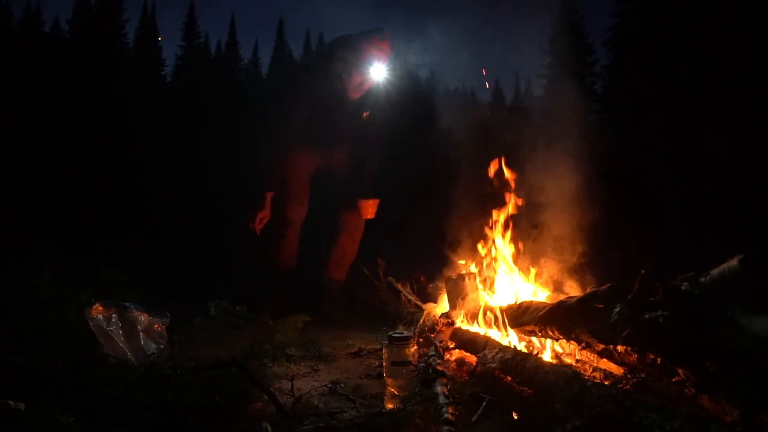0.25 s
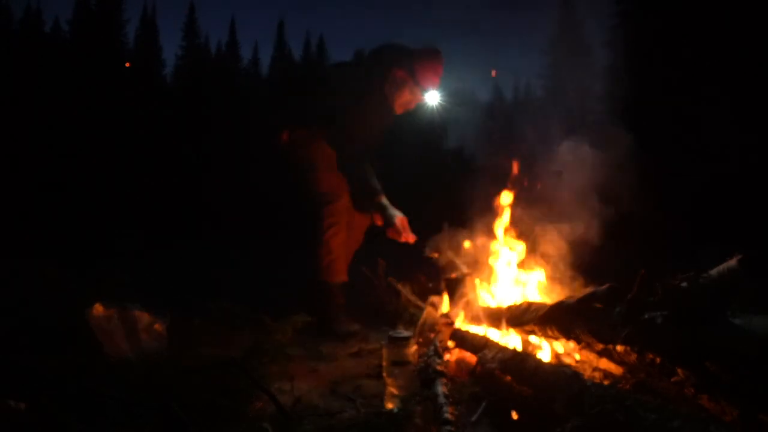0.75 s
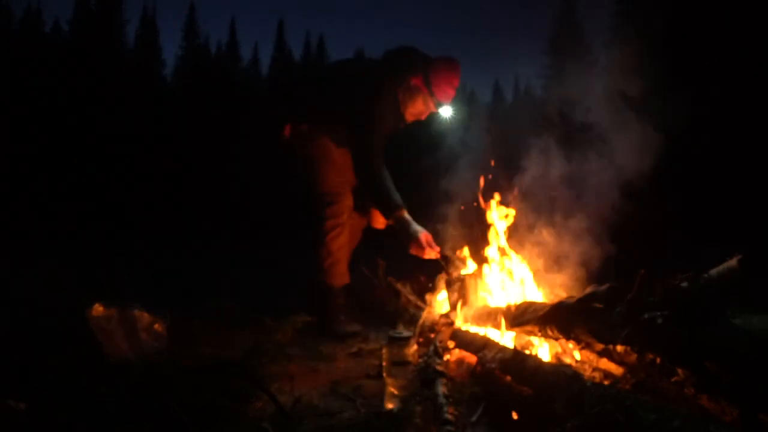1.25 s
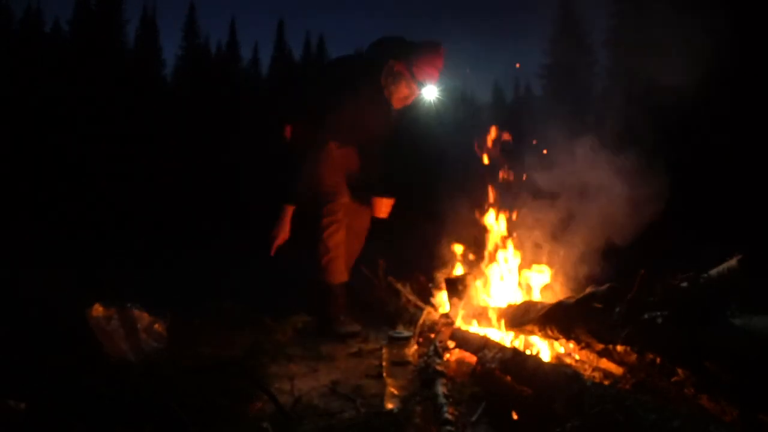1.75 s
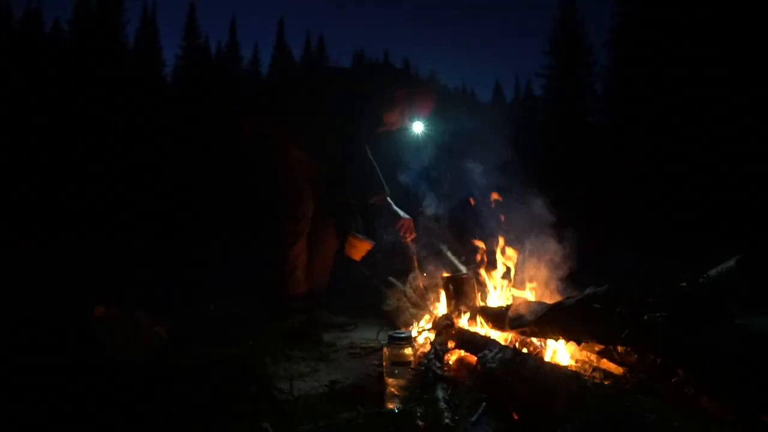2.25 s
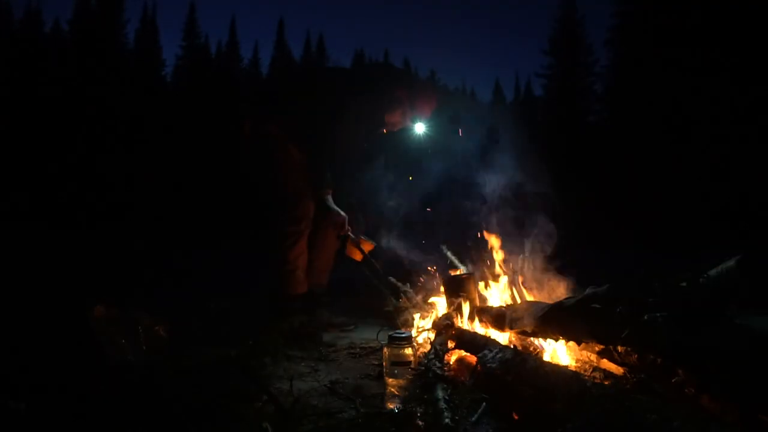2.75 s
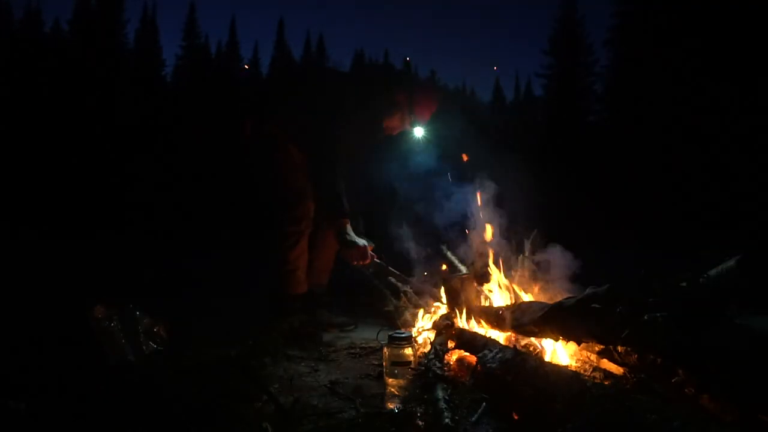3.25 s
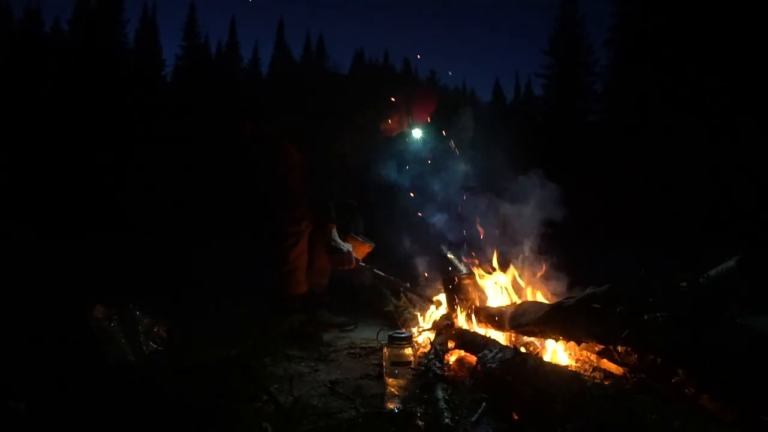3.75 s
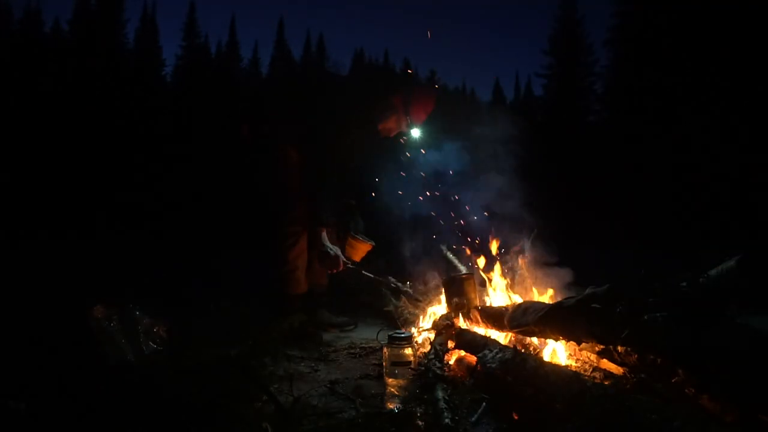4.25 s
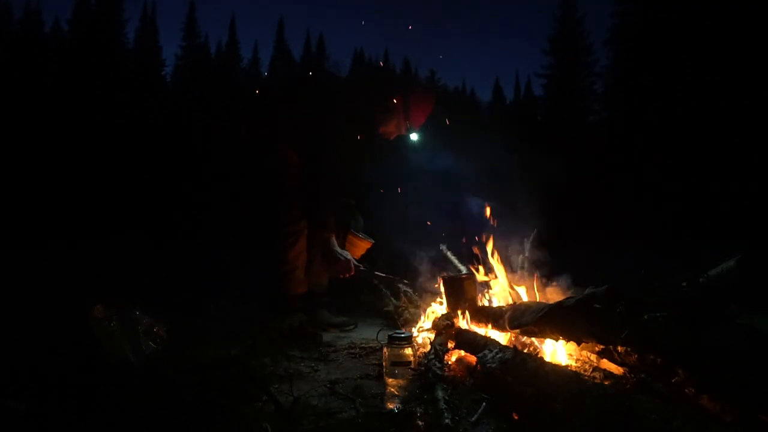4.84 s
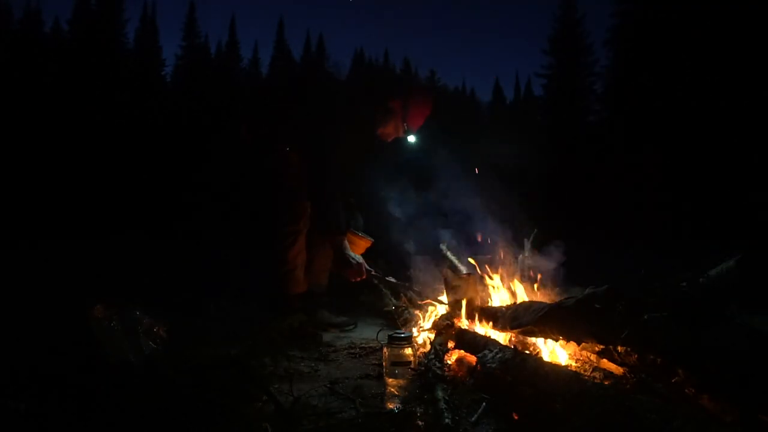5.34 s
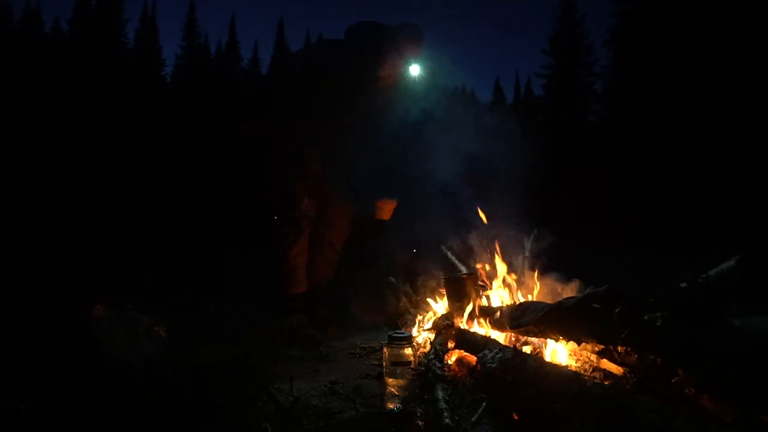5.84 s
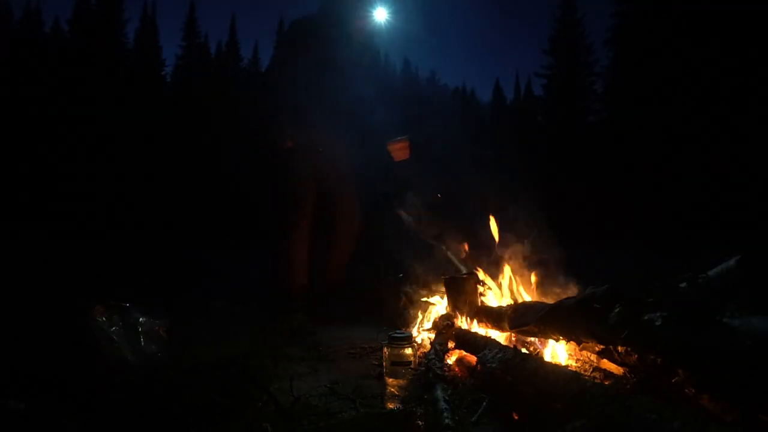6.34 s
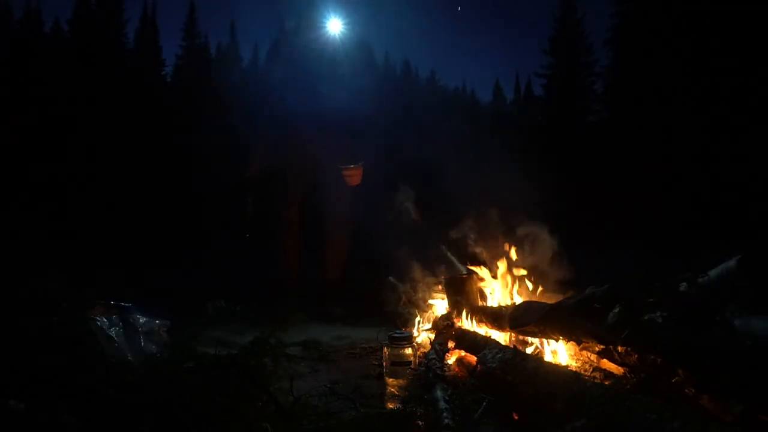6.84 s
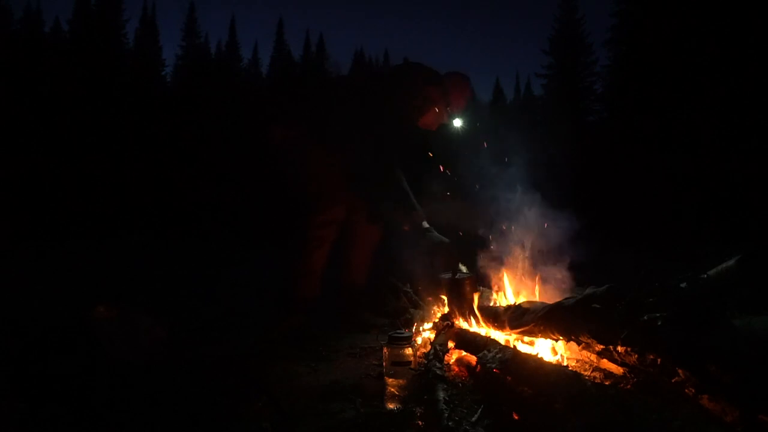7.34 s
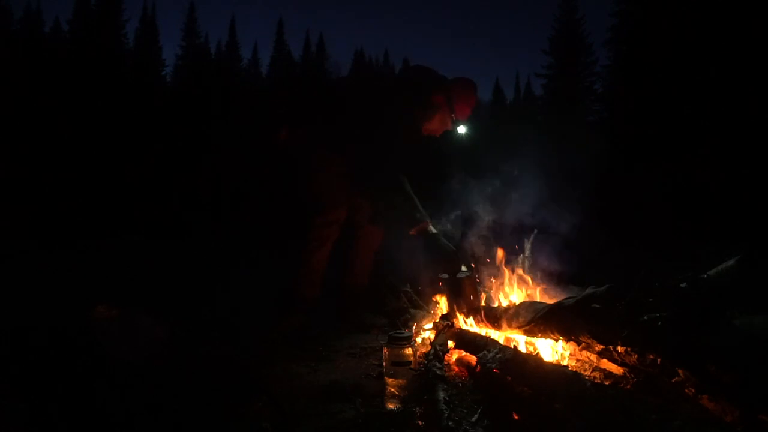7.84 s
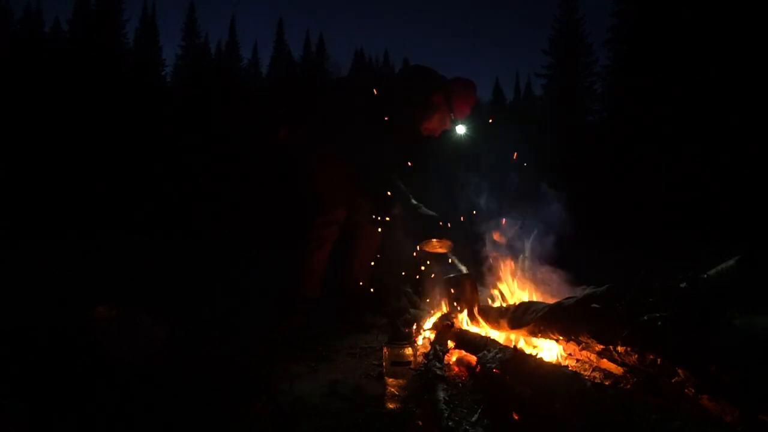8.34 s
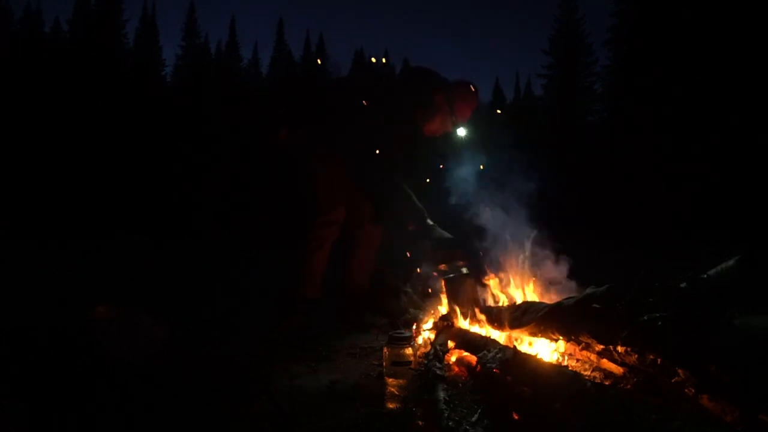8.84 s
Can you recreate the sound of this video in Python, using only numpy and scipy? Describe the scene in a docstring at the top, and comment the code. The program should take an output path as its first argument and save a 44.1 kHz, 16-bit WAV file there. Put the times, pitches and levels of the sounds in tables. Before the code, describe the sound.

Close to a campfire at night outdoors, embers tick and snap over a faint flickering hiss and low roar. Feet shuffle on dry twigs with small rubbery squeaks, a tin is knocked and rattles thinly, then a steel blade scrapes ash in short gritty strokes. More shuffling follows, then fainter scrapes and two very loud pops. Near stereo microphone, no echo.

```python
"""Campfire with shuffling feet, tin and blade

Embers pop and tick over a soft roar and hiss: sharp pulses with scattered tails over flickering noise bands.
Someone shuffles over twigs and dry ground: random grains and gliding tones, gated by short bursts and rustle.
A sole squeaks as a wavering harmonic stack. A tin is knocked: noise chatter excites thin resonances.
A steel blade drags through the ashes in short strokes: gritty clicks excite the modes of the plate."""
import sys
import numpy as np
from scipy import signal
from scipy.fft import rfft, irfft, next_fast_len
from scipy.io import wavfile
from scipy.ndimage import uniform_filter1d

SR = 44100
rng = np.random.default_rng(int(sys.argv[2]) if len(sys.argv) > 2 else 0)


def put_to_file(sound):
    """Save the sound as 16-bit audio at rate SR, in the file named by the first command-line argument."""
    columns = np.atleast_2d(sound).T  # one column per channel
    safe = np.clip(columns, -1, 1)
    whole_steps = np.round(safe * 32767)
    wavfile.write(sys.argv[1], SR, whole_steps.astype(np.int16))


N = 400869  # samples

# Gain over frequency that shapes the noise of the fire: hz, gain_db
FIRE_SPECTRUM = [(15, -71), (25, -28.5), (178, -6), (284, -0.5), (427, -3.5), (1170, -2.5), (1270, -4.5),
                 (1910, -7), (2590, -2), (8590, -9), (11000, -8), (15200, -7), (17000, -38)]
# Likeness of the fire noise at the two ports: hz, left_right_correlation (0-1)
FIRE_LIKENESS = [(100, 0.95), (290, 0.99), (640, 0.086), (15000, 0.17)]
# Flames swell and sink, with full effect only in the deep bass: start_s, level_db
ROAR = [(0, 4.5), (1, 5.5), (2, 3.5), (3, 4.5), (4, 3), (5, -2), (6, 3.5), (7, -2), (8, 0), (9.09, -4)]
FIRE_DB = -58.5  # RMS level of the fire ahead of the recorder

# Embers and twigs cracking, and the blade's first touch; fixed offsets are added to the last four columns:
# start_s, level_db (2.5-6 kHz), low_db (.3-1 kHz), mid_db (1-2.5 kHz), high_db (6-15 kHz), all three relative
# to level_db, pan_db (left minus right)
CRACKS = [(0.1435, -27.5, -30, -14, -18, 8), (0.2475, -46, -9, 6, -10, -3),
          (0.3721, -44, -18, -10, -6, 0.0), (0.3848, -44, -8, 1, 3.5, -4), (0.5786, -35, -7, 7, -10, -2.0),
          (0.61, -29, -14, 3, -13, -1), (0.8386, -36.5, -23, 9, -18, -2), (1.0184, -49.5, -13, 2.5, 0, -1),
          (1.26, -21, -13.5, -17, -1.5, -2.5), (1.2787, -33, -14, -6, -7, -1),
          (1.293, -31.5, -0.5, 2, -6, -5.5), (1.4501, -37.5, -5, -3, -1.5, -3),
          (1.5669, -17.5, -23, -14, -1, -6.5), (1.8507, -37.5, -13, 1, -6, -5),
          (1.8634, -40.5, 0, 7, -13, -2), (1.8797, -38, -10, 5, -14, -2), (1.9363, -34, -27, -1, -9, -1),
          (1.9444, -30, -21, 7.5, -15, 2), (1.9618, -33, -6, 8.5, -11, -1.5), (1.9956, -36, -10, -2, 4, -2),
          (2.0212, -21.5, -22, -11, -24, 1), (2.1327, -20, -29, -15, -7, -3),
          (2.1522, -29, -17, -12, -6, 0), (2.2084, -30, -10.5, -10, -4, -4),
          (2.6377, -37.5, -13, -6, -11, -3), (2.6688, -19, -15, -9.5, -9.5, -2.0),
          (2.9601, -18.5, -23, -10.5, -7, -5.5), (3.021, -28, -19, -11.5, -10, -7.0),
          (3.4328, -11, -16.5, -8.5, -11.5, -4.5), (3.6284, -31.5, 5.5, -3, -6.5, -3.5),
          (3.8225, -34, -12, -13, -5, -1.5), (3.9347, -24.5, -13.5, -6.5, 1, -5.5),
          (4.1317, -25, -18, -9, -13, -2.5), (4.556, -25.5, -21, -19, -14, -4),
          (4.815, -39, -17, -8, -12, -0.5), (4.9674, -21.5, -26, -9, -3, -4),
          (5.234, -48, -32, -6, -16, -3.0), (5.3153, -48.5, -5, -4, -3, -2.5),
          (5.3795, -21.5, -22, -9.5, -7.5, -3.5), (5.5862, -45.5, -21, -1, 2, -5.5),
          (5.7031, -38.5, -5, -20, -6, -3.0), (5.8164, -46, 2.5, 3, -6, -1.0),
          (5.8497, -38.5, -18, -0.5, -19, -2.0), (5.882, -33.5, -10, 1.5, -10, -2),
          (6.0736, -52, -14, -11, 14, -1.0), (6.1162, -34, -12, -6, -24, 0),
          (6.1566, -30, -27, -14, -15, 0.0), (6.323, -45, -16, 2, -16, -1.0),
          (6.3746, -38.5, -6, -1, -17, -1.5), (6.6399, -33, -22, -9.5, -1, -3.5),
          (6.8072, -40, 1, -1.5, -3, -2), (6.8269, -37, -18, -15, -4, 0.5),
          (6.8726, -29.5, -28, -20, 0.5, 4), (6.9646, -44, -1, 2.5, -4, -1.0),
          (6.998, -37.5, -27, -21, 1, 0), (7.0532, -37, -21, -9, -17, 2),
          (7.1068, -34.5, -14, -23, -18, 1.5), (7.2225, -40, -23, -10, -20, 0.0),
          (7.2401, -36.5, -27, -6, -21, 1.0), (7.2669, -29, -25, -9, -26, 1.5),
          (7.2804, -38, -13, -3, -18, -1.0), (7.436, -32.5, -19, -14.5, -1, -1),
          (7.5984, -48, 0, 2, -5, -3.0), (7.6179, -15, -20.5, -15, -14, -2.5),
          (7.8987, -6, -38, -26.5, -13, -2), (8.025, -39.5, -29, -17, -3.5, -12),
          (8.3522, -40, -15, -6, -5, -2.5), (8.4147, -40, -13, -18, -18, -2.5),
          (8.5838, -39, -27, -21, 2, -3), (8.7154, -45, -19, -11, -10, -1),
          (8.7357, -40, -21, -12, -6.5, -4), (8.9199, -18.5, -28, -21, -1.5, -3),
          (8.9344, -39, -28, -8.5, -13, -9)]
# Filter bands in the order of those levels: from_hz, to_hz
CRACK_BANDS = [(2500, 6000), (370, 1000), (1000, 2500), (6000, 16500)]

# Scuffs of feet on twigs, and a few short cracks of embers or twigs: start_s, attack_s, hold_s, fall_db_per_s,
# level_db, then relative to it crisp_db, thud_db, swish_db
BURSTS = [(0.0, 0.05, .005, 240, -37.5, 1.5, -34, -26), (.135, 0.0078, .003, 310, -40.5, 0, -22, -14),
          (.242, 0.0049, .002, 470.5, -45.5, -20, -23, -19), (.403, 0.042, .002, 851, -34, -2.5, -16, -6),
          (.468, 0.023, 0.17, 272, -33.5, -6, -21, -18), (.74, 0.023, .002, 2000, -33.5, -30, -33, -25),
          (.82, 0.026, .003, 270, -38, -10, -30, -14), (.865, 0.02, 0.032, 1100, -39.5, -11, -35, -17),
          (.158, .006, .003, 900, -42, -8, -24, -14), (.918, .004, .002, 1500, -43, -10, -28, -18),
          (.945, .004, .002, 1200, -56, -15, -18, -12), (2.0, .005, .003, 1200, -38, -8, -25, -16),
          (1.02, 0.011, .003, 600, -55, -23, -24, -13), (1.44, .01, .002, 1000, -54, 0, -18, -10),
          (1.685, 0.015, .003, 470, -54, 0, -23, 1), (1.845, 0.031, 0.0076, 250, -46.5, -14.5, -24, -19),
          (1.895, 0.015, 0.0097, 1200, -41.5, -14, -20, -16), (1.325, 0.0045, .002, 900, -58, -8, -12, -2),
          (1.938, 0.011, 0.0018, 1200, -30, -24, -33, -20), (1.99, 0.03, .003, 232, -38, -5, -25, -11),
          (2.04, 0.013, 0.088, 1900, -45.5, 0, -2.5, -7), (3.412, .003, .002, 1500, -43, -6, -20, -20),
          (5.558, 0.0047, 0.0018, 213, -56, -5, -30, -9), (5.805, 0.0084, .003, 650, -43.5, -22, -28, -14),
          (5.843, 0.0061, .075, 600, -47, -2.5, -33, -18), (5.915, .006, 0.0021, 1400, -38, -23, -30, -25),
          (5.935, 0.0079, .002, 700, -43, -17, -30, -16), (6.108, 0.015, .002, 1300, -42, -13, -6.5, -25),
          (6.18, 0.03, 0.021, 2000, -37, 1.5, -38, -12), (6.315, .011, .002, 800, -54, -13, -22, -16),
          (6.36, 0.01, .01, 190, -42, -2.5, -16, -18), (6.8, .006, .003, 198, -55, -8, -22, 3),
          (6.865, 0.0077, 0.0018, 1100, -49.5, 1, -29, -5), (6.77, 0.0037, .002, 1200, -53, -15, -25, -15),
          (6.97, 0.0044, .003, 900, -44.5, -8, -20, -14), (7.362, .006, .006, 900, -58, -15, -6, -12),
          (7.268, 0.013, .002, 2000, -38.5, -12, -24, -20)]
# Restless rustle between bursts, one table a spell of moving about: start_s, twigs_db, thud_db, swish_db (cloth)
RUSTLE = [
    [(0.0, -47, -63, -55), (.2, -62.5, -67, -54), (.4, -55.5, -72, -64), (.7, -59, -64, -61.5),
     (.95, -68, -78, -63), (1.1, -81, -71, -71), (1.4, -71, -71, -64.5), (1.6, -55.5, -80, -53.5),
     (1.8, -62, -67, -61), (1.9, -55, -61, -56.5), (2.15, -59, -58, -58), (2.18, -89, -82, -82)],
    [(5.55, -72, -82, -64), (5.75, -58, -84, -62), (5.83, -55.5, -86, -57.5), (5.95, -57.5, -62, -59.5),
     (6.1, -60.5, -67, -55), (6.3, -56.5, -76, -61), (6.45, -60.5, -65, -55), (6.6, -67, -80, -64),
     (6.8, -62.5, -85, -62), (7.0, -60.5, -65, -55), (7.1, -54.5, -74, -51), (7.2, -58.5, -65.5, -63),
     (7.33, -63, -86, -61), (7.48, -69, -80, -68)],
]
# Gain over frequency of rasping twigs: hz, gain_db
TWIG_SPECTRUM = [(180, -36), (300, -21), (662, -12.5), (730, -3.5), (1180, -13), (1370, -3.5), (1810, -0.5),
                 (4000, -19.5), (5200, -36), (8800, -120)]
RUSTLE_CRISP_DB, FEET_PAN_DB = 0, 1.7  # crispness of rustle; left minus right level of the twigs

# A sole squeaks, one table a squeak: start_s, pitch_hz, fundamental_db, overtone_db (the first),
# fall_db (per further overtone)
SQUEAKS = [
    [(0.03, 450, -60, -56, 0), (0.05, 779, -59, -43, 3), (0.075, 958, -62, -51, 3),
     (0.1, 1153, -49, -52, -1), (0.12, 1255, -49, -55, 4), (0.135, 1260, -56, -64, 10)],
    [(0.655, 905, -57, -47, 12), (0.675, 1090, -48, -34, 12), (0.69, 1040, -53, -45, 14),
     (0.717, 1110, -52, -44, 16), (0.74, 880, -66, -49, 12)],
    [(5.925, 602, -57, -60, 10), (5.94, 908, -45, -56, 10), (5.958, 1513, -58, -62, 10)],
]

# A tin knocked and rattling: start_s, level_db, t60_ms (decay of the chatter), low_db (low partials, before an offset)
TAPS = [(1.1466, -39.5, 165, -9), (1.4948, -22.5, 136, -15.5), (1.5994, -45.5, 150, -8),
        (1.6806, -48, 110, -1.5), (1.7436, -29, 58, -12.5), (1.7959, -31, 49, -12), (1.8454, -39, 83, -10),
        (1.9949, -40, 100, -10)]
# Modes of the tin, the width being scaled by the degree of damping: mode_hz, width_hz, level_db
TIN_MODES = [(1170, 29, -6), (1770, 29, -4), (2080, 38, -7), (2610, 42, -5), (3040, 110, -10),
             (3430, 47, -9), (4080, 31, 0), (4590, 21, -11), (4980, 55, -9), (5650, 51, -1), (6300, 33, -2),
             (6730, 92, -5), (7000, 27, -5), (7450, 52, -3), (7870, 47, -9), (8420, 37, -9), (8670, 33, -9),
             (8890, 38, -9), (10100, 110, -6), (10800, 160, -13), (11400, 52, -9), (12200, 41, -10),
             (12500, 72, -6), (14600, 75, -13)]

# Blade dragged through ash and grit, one row a push: start_s, attack_s, hold_s, fall_db_per_s, level_db,
# ring_db (share of steel), bright_db, weight_db (balances before offsets and the effect of drag level),
# sing_hz (mode left singing by the grip), sing_db (its lift)
STROKES = [(2.268, .012, 0.049, 333, -29, -4, -4, -9, 1090, 15.5),
           (3.225, 0.026, 0.0047, 321, -30.5, -5, -4, -7, 3380, 2),
           (3.645, .017, 0.042, 274, -29, -2.5, -1.5, -8, 2450, 0.5),
           (4.122, 0.028, 0.041, 319, -28, -3, -2, -7.5, 3380, 4.5),
           (4.552, 0.0041, 0.014, 300, -28.5, -3, -2.5, -7, 3380, 7),
           (4.565, 0.032, 0.0037, 196, -27, 3.5, -0.5, -7, 2450, 0),
           (4.67, 0.0079, 0.043, 900, -41, -5, -4, -4.5, 2450, 14),
           (4.962, 0.018, .02, 294, -26.5, 4.5, -1.5, -9, 3840, 6),
           (5.11, 0.017, 0.087, 502, -62.5, 1, -3, 0.5, 2450, 18),
           (5.35, 0.029, 0.019, 330, -31.5, -0.5, -2.5, -9, 3400, 4),
           (5.42, 0.0048, 0.01, 250, -29.5, -5.5, -2, -7, 1550, 17.5),
           (5.5, .02, .06, 300, -62, 3, -12, 0, 3380, 17),
           (7.49, 0.0079, 0.066, 500, -52.5, 4.5, -15, -10, 1550, 12),
           (7.74, 0.07, .02, 900, -67, 6, -15, -2, 1830, 19),
           (7.82, 0.025, 0.014, 900, -40, -1, -8.5, -8, 1830, 17),
           (8.04, 0.013, 0.023, 272, -53, -3.5, -10, -5.5, 1830, 12)]
# Filter bands of the grit, top to thump: from_hz, to_hz
STROKE_BANDS = [(7000, 17000), (2000, 7000), (800, 2000), (150, 800)]
# Gain over frequency of the grit: hz, gain_db
GRIT_SPECTRUM = [(150, -17), (700, -7.5), (1300, 6.5), (2000, -2), (4000, 2), (7000, -1.5), (11000, -5),
                 (15500, -6.5)]
# Modes of the blade, the width being scaled by the degree of damping: mode_hz, width_hz, level_db
BLADE_MODES = [(1550, 110, -5), (2450, 78, -2), (2620, 29, -5), (3140, 59, -6), (3380, 45, 0),
               (3840, 32, 0), (4030, 54, -4), (4470, 48, -2), (4790, 32, -8), (4950, 39, -4),
               (5290, 26, -5), (6300, 35, -2), (7180, 30, -8), (7390, 51, -10), (7680, 28, -7),
               (7900, 58, -1), (8820, 160, -12), (9470, 41, -4), (9870, 45, -1), (10300, 31, -6),
               (10600, 48, -8), (11800, 59, -10), (12000, 37, -10), (13300, 84, -13), (13500, 48, -11),
               (13800, 67, -10), (14000, 54, -5), (14300, 87, -7), (1090, 70, -6), (1830, 80, -9)]
# dB of treble lost and of low middle gained per dB that a stroke lies under its peak
DULLING, FILLING = 0.3, 0.13

# Stereo spread of scattered grains: hz, side_minus_mid_db
GRAIN_WIDTH = [(200, -24), (1000, -15.5), (4000, -4.5), (12000, -15)]
# Sensitivity difference between the ports: hz, left_minus_right_db
LEFT_PORT = [(200, 0), (700, -2.5), (1300, -4), (2400, -4), (4400, -2.5), (8000, 0.1), (15000, -1.5)]
# Left port delay in microseconds: late for cracks, tin and blade, early for the feet
FIRESIDE_LAG_US, FEET_LAG_US = 15.4, -16
TOP_HZ = 15900  # upper limit of the recorder


def undb(db):
    """Decibel definition: amplitude ratio is ten to the power of dB / 20."""
    return 10 ** (np.asarray(db) / 20)


def unit(x):
    """Normalisation: scale a signal to an RMS of one."""
    return x / np.sqrt(np.mean(x ** 2))


def along(table, hz):
    """Logarithmic frequency scale: interpolate between (hz, value) points."""
    at, value = np.transpose(table)
    return np.interp(np.log(np.maximum(hz, 1)), np.log(at), value)


def colour(x, table):
    """Linear filtering: multiply the spectrum by a gain through (hz, db) points."""
    size = next_fast_len(N)
    hz = np.arange(size // 2 + 1) * SR / size
    return irfft(rfft(x, size) * undb(along(table, hz)), size)[..., :N]


def band(x, lo_hz, hi_hz, order=2):
    """Band-pass filtering: keep the components between two frequencies."""
    return signal.sosfilt(signal.butter(order, [lo_hz, hi_hz], "band", fs=SR, output="sos"), x)


def columns(tables, rest):
    """Piecewise-linear control: join tables in time, each column at its rest value between them."""
    out = np.outer(rest, np.ones(N))
    for table in tables:
        s, *values = np.transpose(table)
        span = slice(int(s[0] * SR), int(s[-1] * SR))
        for k, v in enumerate(values):
            out[k, span] = np.interp(np.arange(N)[span] / SR, s, v)
    return uniform_filter1d(out, 64)


def gestures(rows):
    """Envelope and masking: swell, hold, fade; the loudest gesture sets level, dB under its peak and columns."""
    s = np.arange(N) / SR
    out = np.zeros((len(rows[0]) - 3, N))
    out[0] = -150
    for at, attack, hold, fall, db, *rest in rows:
        # follow the fade for 80 dB
        span = slice(int(at * SR), int((at + attack + hold + 80 / fall) * SR))
        t = s[span] - at
        fade_db = fall * np.maximum(t - attack - hold, 0)
        swell_db = 20 * np.log10(np.clip(t / attack, .001, 1))
        under = fade_db - swell_db
        louder = db - under > out[0, span]
        settings = [v + 0 * t for v in rest]
        out[:, span] = np.where(louder, [db - under, under] + settings, out[:, span])
    return uniform_filter1d(out, 64)


def walk(rate):
    """Random modulation: levels held 1 / rate s and slewed twice, with a spread near 1."""
    k = int(SR / rate)
    steps = np.repeat(rng.standard_normal(N // k + 1), k)
    return 1.65 * uniform_filter1d(uniform_filter1d(steps, k), k)[:N]


def grains(rate, spread_db):
    """Shot noise: very uneven clicks at random moments, left and right differing most near 4 kHz."""
    chance = rng.random((2, N)) < rate / SR
    sizes = undb(spread_db * rng.exponential(size=(2, N)))
    mid, side = chance * rng.standard_normal((2, N)) * sizes
    return unit(mid) + colour(unit(side), GRAIN_WIDTH) * np.array([[1], [-1]])


def pan(db):
    """Interaural level difference: split left minus right dB evenly between the channels."""
    return undb(np.array([db, -db]) / 2)


def lag(x, us):
    """Arrival-time difference: delay the left channel by a linear phase shift."""
    size = next_fast_len(N)
    hz = np.arange(size // 2 + 1) * SR / size
    turn = np.exp(-2j * np.pi * hz * us * 1e-6)
    return np.array([irfft(rfft(x[0], size) * turn, size)[:N], x[1]])


def ring(drive, modes, narrow, free_width_hz, free_db, wander_db, sing_hz=1., sing_db=0.):
    """Modal resonance: thin metal is damped while touched, rings on when free, and is unevenly driven."""
    out = 0
    for hz, width, db in modes:
        push = drive * undb(wander_db * walk(7))
        if hz < 4000:
            singing = np.abs(sing_hz - hz) < .055 * hz
            push = np.where(singing, undb(sing_db) * drive, push)
        touched = signal.lfilter(*signal.iirpeak(hz, hz / (narrow * width), fs=SR), push)
        free_width = free_width_hz * (1 + (hz / 4500) ** 2)  # higher modes lose energy faster
        free = signal.lfilter(*signal.iirpeak(hz, hz / free_width, fs=SR), push)
        out = out + undb(db) * pan(5.5 * walk(2.27)) * (touched + undb(free_db) * free)
    return out


def fire():
    """Turbulent combustion noise: half-octave bands flicker separately and the flames move the bass most."""
    s, roar_db = np.transpose(ROAR)
    roar_db = np.interp(np.arange(N) / SR, s, roar_db)
    out, swell = 0, walk(2.7)
    for hz in 25 * 2 ** np.arange(0, 9.5, .5):
        mid, side = band(rng.standard_normal((2, N)), hz / 2 ** .25, hz * 2 ** .25)
        like = np.clip(along(FIRE_LIKENESS, hz), 0, 1)
        flames_db = (roar_db + 2.0 * swell + 2.4 * walk(5)) / (1 + hz / 900)
        flicker_db = flames_db + 0.86 * walk(18)
        # mid and side powers set the correlation between the channels
        stereo = np.sqrt(1 + like) * mid + np.sqrt(1 - like) * side * np.array([[1], [-1]])
        out = out + undb(flicker_db) * stereo
    return unit(colour(out, FIRE_SPECTRUM)) * undb(FIRE_DB)


def embers():
    """Random small fractures: faint ticks, seven a second on average, each with its own colour."""
    rows = []
    for t, a, b, c, d, p in rng.random((int(7 * N / SR), 6)):
        rows.append((t * N / SR, -62 + 11 * a ** 3, -25 + 16 * b, -12 + 14 * c, -4 + 12 * d, 8 * p - 6.5))
    return cracks(rows)


def cracks(rows):
    """Impulse and scattering: a sharp pressure pulse, then echoes off logs and ground in a faint tail."""
    size = 3000
    s = np.arange(size) / SR - .001  # the pulse stands 1 ms into the crack
    push = np.zeros((4, 2, N + size))
    scatter = undb(-23.0) * np.exp(-(s / 0.0051) ** 2) + undb(-40.5) * np.exp(-s / 0.015)
    splinter = undb(-10.0) * np.exp(-np.abs(s) / 0.00027)
    own_noise = np.array([0.071, 0.056, 1.0, 1.0])[:, None, None]  # stereo spread of the tail, per band
    for at, db, low_db, mid_db, high_db, pan_db in rows:
        noise = rng.standard_normal((3, size))
        pulse = np.sign(noise[0, 0]) * (np.arange(size) == np.argmin(np.abs(s)))
        snap = pulse + splinter * noise[0]
        tail = np.where(s > 0, scatter, 0) * (noise[0] + own_noise * noise[1:])
        gains = undb(db + np.array([0, low_db + 14.5, mid_db + 8.5, high_db + 2.5]))
        i = int(at * SR)
        push[:, :, i:i + size] += gains[:, None, None] * pan(pan_db + 2.0)[:, None] * (snap + tail)
    return undb(13.5) * sum(band(p[:, :N], *edge, order=3) for p, edge in zip(push, CRACK_BANDS))


def chirps(rate):
    """Gliding oscillation: bent twigs creak in short tones of chance pitch, length and size."""
    out = np.zeros(N + SR)
    for at, pitch, glide, length, size in rng.random((int(rate * N / SR), 5)):
        s = np.arange(int((0.0099 + 0.019 * length) * SR)) / SR
        hz = 950 * 2 ** (1.3 * pitch) * (1 + 22 * (glide - .5) * s)
        i = int(at * N)
        phase = 2 * np.pi * np.cumsum(hz) / SR
        tone = np.sin(phase) + 0.18 * np.sin(2 * phase)
        out[i:i + len(s)] += undb(10 * size) * np.hanning(len(s)) * tone
    return unit(out[:N])


def shuffle():
    """Friction and fracture: twigs rasp, creak and crack in uneven bursts, the ground thuds and cloth swishes."""
    burst_db, _, crisp_db, thud_db, swish_db = gestures(BURSTS)
    twigs, ground, cloth = undb(columns(RUSTLE, [-120, -120, -120]))
    rasp = grains(12000, 1.4)
    # bursts and rustle add as powers
    crisp_level = np.hypot(undb(burst_db + crisp_db), undb(RUSTLE_CRISP_DB) * twigs)
    crisp = crisp_level * unit(band(rasp, 2040, 5730))
    creaking = undb(-3.5) * unit(colour(rasp, TWIG_SPECTRUM)) + undb(-8.5) * chirps(220)
    crunch = np.hypot(undb(burst_db), twigs) * creaking
    thud_level = np.hypot(undb(burst_db + thud_db), ground)
    thud = unit(band(grains(900, 2.15), 184, 860, order=3)) * thud_level
    swish_level = np.hypot(undb(burst_db + swish_db), cloth)
    swish = unit(band(grains(9000, 2.78), 6800, 19400)) * swish_level
    twig_sound = (crunch + undb(-3.5) * crisp) * undb(1.12 * walk(90)) * pan(FEET_PAN_DB)[:, None]
    return twig_sound + thud + swish * undb(2.5 + 1.94 * walk(40))


def squeaks():
    """Stick-slip friction: rubber slips almost evenly, giving a thin, rough, wavering harmonic stack."""
    hz, first_db, over_db, fall_db = columns(SQUEAKS, [1000, -120, -120, 0])
    phase = 2 * np.pi * np.cumsum(hz * (1 + 0.015 * walk(250))) / SR
    overtones = 0
    for k in range(4):
        level = undb(over_db - k * fall_db + 1.7 * walk(101.1))
        overtones = overtones + level * np.sin((k + 2) * phase)
    fundamental = undb(first_db + 2.2 * walk(104.0)) * np.sin(phase)
    return np.sqrt(2) * (fundamental + overtones)


def tin():
    """Impact excitation: each knock chatters briefly and leaves thin partials ringing."""
    s = np.arange(N) / SR
    high = low = 0
    for at, db, t60_ms, low_db in TAPS:
        knock = undb(db - 60 * np.maximum(s - at, 0) / (t60_ms / 1000)) * (s >= at)
        high = high + knock
        low = low + undb(low_db + 15.5) * knock
    rattle = grains(9000, 1.0)
    chatter = high * band(rattle, 3000, 16000, order=3)
    drive = chatter + low * band(rattle, 600, 3000, order=3)
    partials = ring(drive.mean(axis=0), TIN_MODES, narrow=1.1, free_width_hz=4., free_db=5., wander_db=2.2)
    return undb(-10) * chatter + undb(-19) * drive + undb(3) * partials


def blade():
    """Friction-driven plate: grit stutters and rings the steel; weaker moments of a stroke are duller, fuller."""
    level_db, under_db, ring_db, bright_db, weight_db, sing_hz, sing_db = gestures(STROKES)
    under_db = np.minimum(under_db, 30)
    bright_db = bright_db - DULLING * under_db
    weight_db = weight_db + FILLING * under_db
    grit = grains(14000, 2.7) * undb(level_db + 2.1 * walk(90))
    top, middle, low, thump = (band(grit, *edge, order=3) for edge in STROKE_BANDS)
    balanced = middle + undb(bright_db + 5.0) * top + undb(weight_db + 3.5) * low + undb(-3.5) * thump
    grit = colour(balanced, GRIT_SPECTRUM)
    steel = ring(undb(ring_db) * grit.mean(axis=0), BLADE_MODES, narrow=.8, free_width_hz=3.5,
                 free_db=-2.5, wander_db=2.5, sing_hz=sing_hz, sing_db=sing_db)
    # the countless lesser modes of the plate: a short noisy response with a jagged spectrum, t60 0.14 s
    s = np.arange(6000) / SR
    plate = rng.standard_normal(len(s)) + 0.8 * rng.standard_normal((2, len(s)))
    plate = plate * undb(-60 * s / 0.14)
    lesser = signal.fftconvolve(grit, plate / np.linalg.norm(plate[0]), axes=1)[:, :N]
    return undb(-0.5) * grit + undb(-6.0) * lesser + undb(8.5) * steel


def scene():
    """Superposition: sources add, those by the fire and the feet with their own arrival-time difference."""
    at_fire = embers() + cracks(CRACKS) + blade() + tin()
    feet = shuffle() + squeaks()
    return fire() + lag(at_fire, FIRESIDE_LAG_US) + lag(feet, FEET_LAG_US)


def record(dry):
    """Transducer response: right port louder in the middle range, deep bass lost, peaks rounded, top cut."""
    left = colour(dry[0], [(hz, db / 2) for hz, db in LEFT_PORT])
    right = colour(dry[1], [(hz, -db / 2) for hz, db in LEFT_PORT])
    ports = signal.sosfilt(signal.butter(2, 45, "high", fs=SR, output="sos"), [left, right])
    rounded = np.tanh(1.242 * ports) / 1.346
    return signal.sosfilt(signal.ellip(8, .2, 70, TOP_HZ, fs=SR, output="sos"), rounded)


dry = scene()
out = record(dry)
put_to_file(out)
```